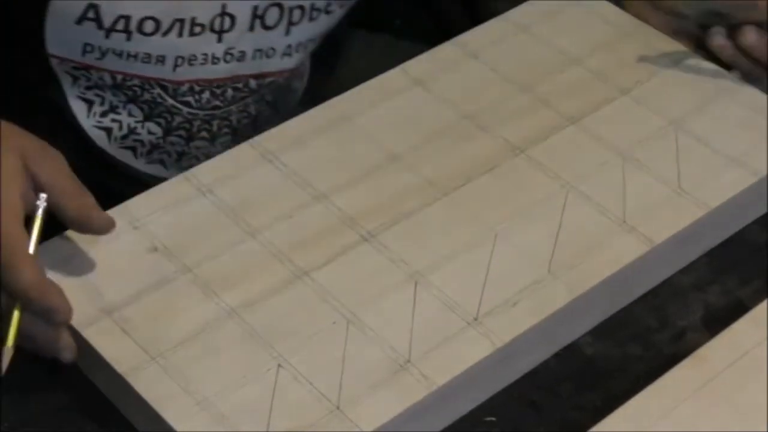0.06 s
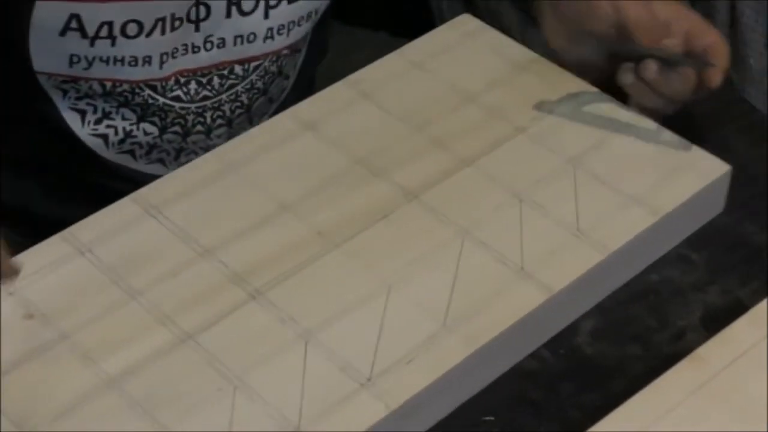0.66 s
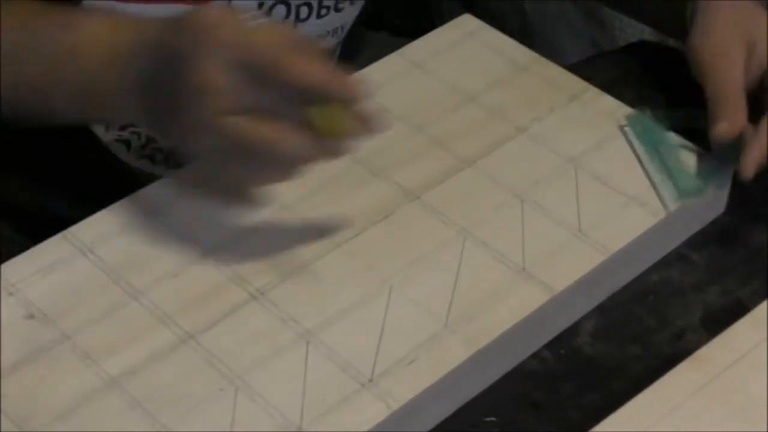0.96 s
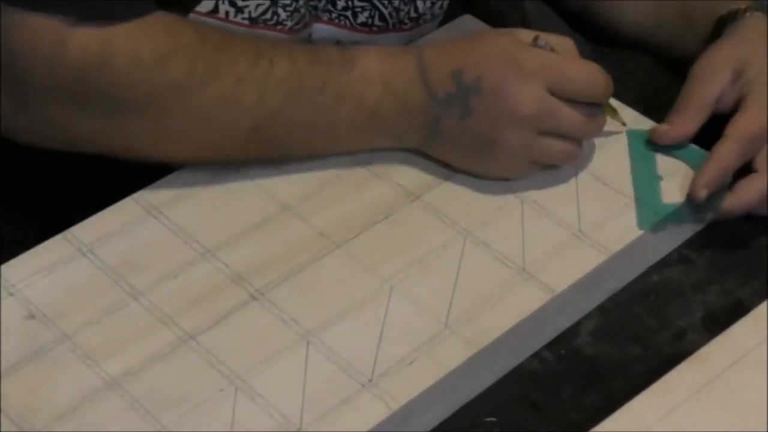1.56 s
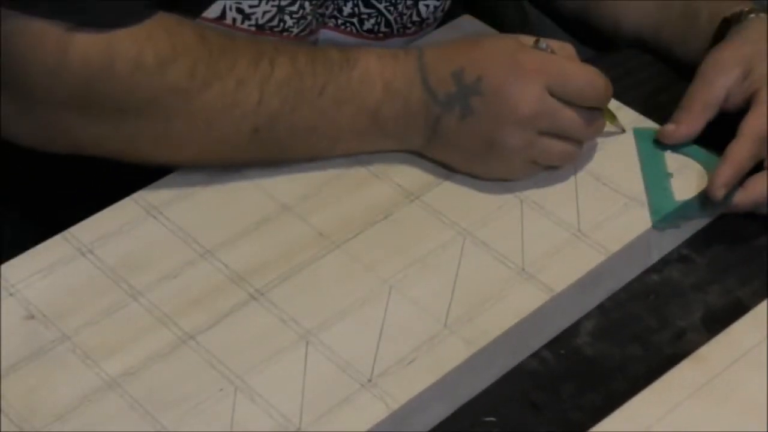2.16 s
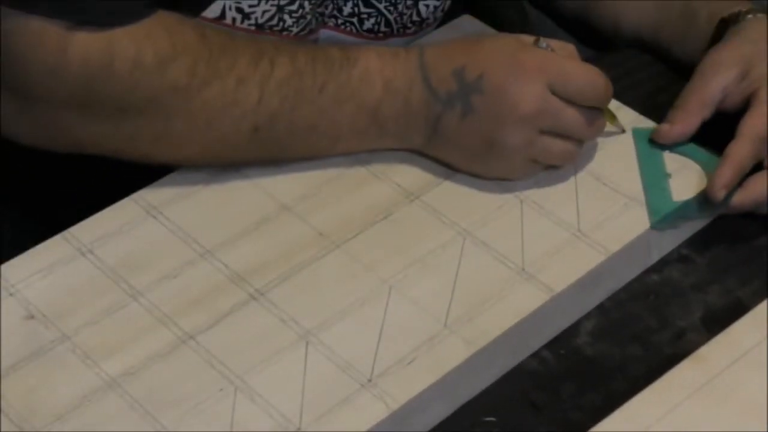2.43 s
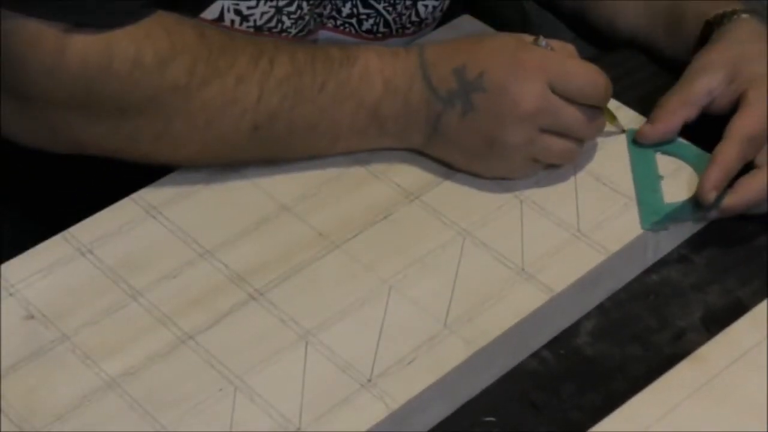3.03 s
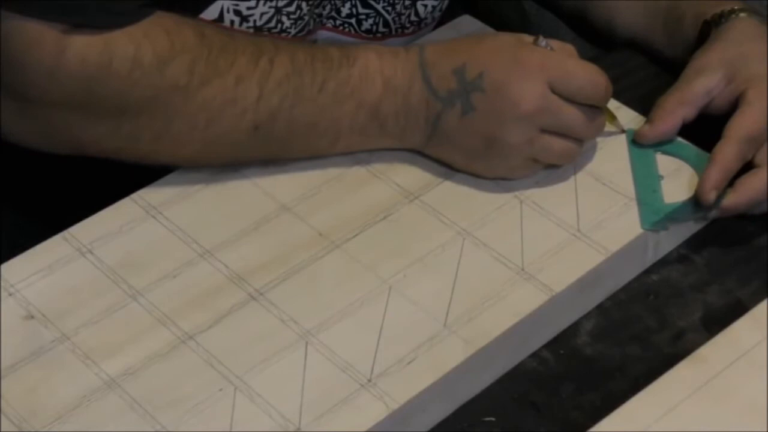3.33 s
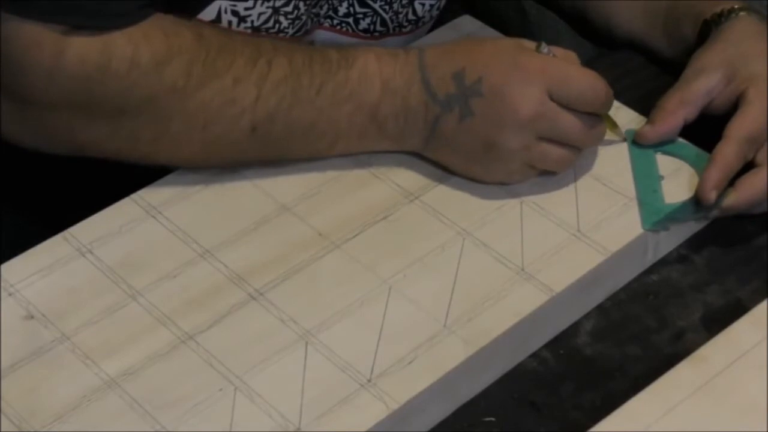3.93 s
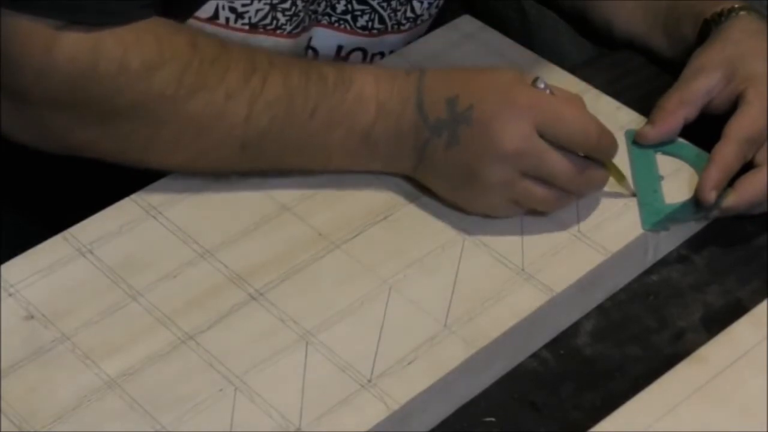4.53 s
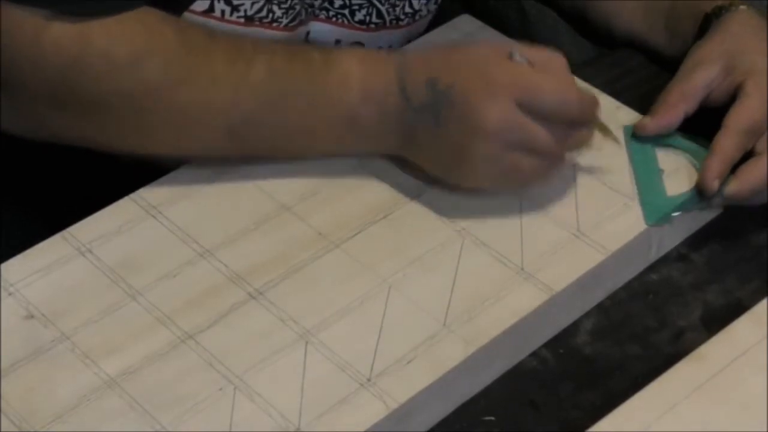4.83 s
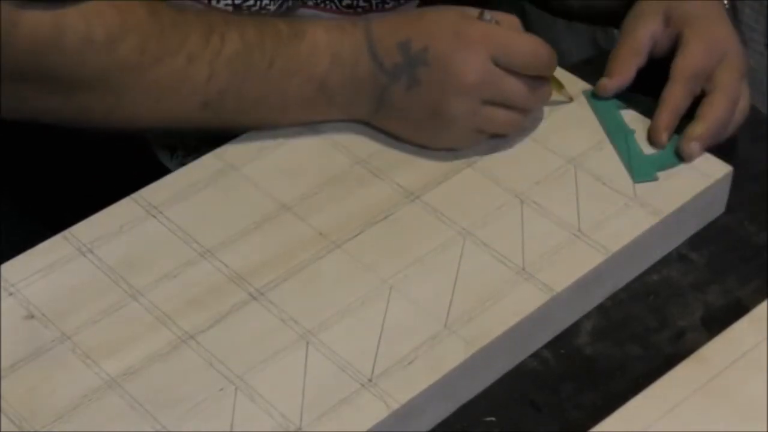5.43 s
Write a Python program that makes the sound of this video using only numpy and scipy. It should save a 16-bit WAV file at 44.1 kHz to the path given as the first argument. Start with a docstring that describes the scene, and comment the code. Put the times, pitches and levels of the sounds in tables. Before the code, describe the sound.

A plastic set square is put down on a wooden board with a light clack and a smaller rattling tap. Dull knocks follow as a hand settles, and a pencil makes a few faint, short scratches. After a pause come two sharp dry clicks, then the set square snaps down on the wood. It is all heard close up in a small, quiet workshop with a faint low hum.

```python
"""A plastic set square knocks on a wooden board, each hit a crack plus ringing modes.
It is put down; a hand with a pencil settles beside it with dull knocks and makes a short mark,
the lead catching on the grain. Sharp dry clicks sound close by, then the set square snaps down
on the wood. Two faint, breath-like swells of resonant hiss come at the start and before the clicks.
A faint low hum and hiss fill the small workshop."""
import sys
import numpy as np
from scipy import signal
from scipy.fft import rfft, irfft, next_fast_len
from scipy.io import wavfile
from scipy.ndimage import uniform_filter1d

SR = 44100
rng = np.random.default_rng(int(sys.argv[2]) if len(sys.argv) > 2 else 0)


def wrap_up_sound(samples):
    """Save the sound to the file named by the first command line argument, as 16-bit audio."""
    columns = np.atleast_2d(samples).T
    # keep every value between -1 and 1, then stretch to whole-number steps
    tamed = np.clip(columns, -1, 1)
    steps = np.round(tamed * 32767).astype(np.int16)
    wavfile.write(sys.argv[1], SR, steps)


N = 250929
TIME_S = np.arange(N) / SR
AGE_S = np.arange(SR // 2) / SR  # time since a blow
SIDE_SIGN = np.array([[1], [-1]])  # left, right


def amp(db):
    """Decibels to gain."""
    return 10 ** (np.asarray(db) / 20)


def unit_rms(x):
    """Scale to rms 1."""
    return x / np.sqrt(np.mean(x ** 2))


def unit_energy(x):
    """Scale to the energy of 10 ms at rms 1."""
    return x / np.sqrt(np.sum(np.atleast_2d(x) ** 2, axis=1).mean() / (SR // 100))


def decay(t60_s):
    """Exponential decay after a blow."""
    return np.exp(-np.log(1000) * AGE_S / t60_s)


def onset(rise_s):
    """Exponential rise to 1."""
    return 1 - np.exp(-AGE_S / rise_s)


def colour(x, points):
    """Minimum-phase filter through (frequency [Hz], gain [dB]) points."""
    size = next_fast_len(x.shape[-1] + 4096) * 2
    hz, db = np.transpose(points)
    gain = amp(np.interp(np.log(np.fft.rfftfreq(size, 1 / SR) + 1), np.log(hz), db))
    cepstrum = irfft(np.log(gain))
    cepstrum[1:size // 2] *= 2
    cepstrum[size // 2 + 1:] = 0
    return irfft(rfft(x, size) * np.exp(rfft(cepstrum)))[..., :x.shape[-1]]


def butter(x, hz, kind, order=2):
    """Low-pass or high-pass."""
    return signal.sosfilt(signal.butter(order, min(hz, .45 * SR), kind, fs=SR, output="sos"), x)


def stereo_noise(side_db):
    """Half a second of mid/side noise."""
    mid, side = rng.standard_normal((2, len(AGE_S)))
    return mid + amp(side_db) * side * SIDE_SIGN


def ring(modes, t60_scale, phase_rad=0):
    """Decaying modes; polarity and phase offset alternate between neighbours."""
    return unit_energy(sum((-1) ** k * amp(db) * np.sin(2 * np.pi * hz * AGE_S + (-1) ** k * phase_rad)
                           * decay(t60_s * t60_scale) for k, (hz, db, t60_s) in enumerate(modes)))


def stressed(modes, centre_hz, gain_db, log_width):
    """The struck spot favours or mutes the modes near one frequency."""
    return [(hz, db + gain_db * np.exp(-(np.log(hz / centre_hz) / log_width) ** 2), t60_s)
            for hz, db, t60_s in modes]


def add(out, time_s, x):
    """Mix x in at time_s."""
    start = int(time_s * SR)
    out[:, start:start + x.shape[-1]] += x[..., :N - start]


# hum envelope: (time [s], level [dB])
HUM_ENVELOPE = [(0, -63), (1.0, -63.5), (2.8, -65), (3.1, -69), (5.6, -65.5)]
# hiss spectrum: (frequency [Hz], gain [dB])
HISS_EQ = [(15, -50.5), (25, -23), (59, -10.5), (69, -14.5), (91, -3.5), (116, -7.5), (260, -12.5),
           (322, -16.5), (457, -14), (703, -17), (919, -17.5), (1270, -22.5), (1900, -21.5), (2360, -26),
           (15500, -32.5)]
# hiss width: (frequency [Hz], side minus mid [dB])
HISS_SIDE_EQ = [(25, 0), (60, -11), (120, -14.5), (300, -13.5), (600, -46), (1000, -33.5), (1600, -22),
                (3000, -23.5), (5000, -47), (16000, -20)]


def room_tone(hum_hz=89.3, hum_width_hz=9, hiss_db=-61):
    """A fluttering narrow-band hum that dips halfway, and steady hiss, widest in the bass."""
    hum_noise, mid, side = rng.standard_normal((3, N))
    detune = (np.fft.rfftfreq(N, 1 / SR) - hum_hz) / hum_width_hz
    hum = irfft(rfft(hum_noise) / (1 + (2 * detune) ** 2), N)
    hum /= np.sqrt(uniform_filter1d(hum ** 2, size=SR // 4))
    hum_db = np.interp(TIME_S, *np.transpose(HUM_ENVELOPE))
    hiss = colour(mid + colour(side, HISS_SIDE_EQ) * SIDE_SIGN, HISS_EQ)
    return amp(hum_db) * hum + amp(hiss_db) * unit_rms(hiss)


# set square on the board; also colours the swells: (frequency [Hz], level [dB], t60 [s])
SQUARE_MODES = [(200.6, -5, 0.19), (295, -2.5, 0.1), (361.7, 0, 0.28), (492, -9, 0.066), (717, -1.5, 0.13),
                (1103, 3, 0.14), (1234, 0.5, 0.2), (1496, 5.5, 0.09), (1618, -1, .15), (1664, 4, 0.082),
                (1895, -4, 0.079), (1965, 3, 0.04), (2190, 8, 0.04), (2400, 2, 0.083), (2545, 4, 0.1),
                (2690, 1.5, 0.07), (2900, 2, 0.056), (3030, 8.5, 0.039), (3400, -5, 0.065),
                (3580, 1.5, 0.074), (4450, -2.5, 0.086), (5190, 3, 0.06), (6300, 4, 0.099),
                (8050, 3, 0.076), (9600, 4, 0.073), (11130, 7, 0.083)]
# swell spectrum: (frequency [Hz], gain [dB])
SWELL_EQ = [(300, 3.5), (800, -3), (1300, -5), (1650, -0.5), (2020, -5), (2300, 5), (2550, -6), (2900, 0),
            (3400, -9.5), (3750, -0.5), (4050, -9), (4500, -6.5), (6000, -16), (10000, -7), (16000, -32)]
# swells of hiss: (start [s], attack [s], hold [s], release [s], level [dB], boosted band [Hz])
SOFT_SWELLS = [(0.02, 0.28, .3, 0.13, -61, 2520), (4.01, 0.11, 0.14, 0.12, -66.5, 1500)]


def soft_swells(ring_db=-10.5, boost_db=5.5, width_oct=0.81, spread_db=7.5):
    """Two faint, breath-like swells of resonant hiss."""
    out = np.zeros(N)
    for start_s, attack_s, hold_s, release_s, db, band_hz in SOFT_SWELLS:
        noise = rng.standard_normal(N) * amp(spread_db * rng.standard_normal(N))
        ringing = signal.fftconvolve(noise, ring(SQUARE_MODES, t60_scale=0.44))[:N]
        ringing = butter(ringing, 5500, "low", order=4)
        hiss = unit_rms(noise) + amp(ring_db) * unit_rms(ringing)
        eq = [(hz, gain_db + boost_db * np.exp(-(np.log2(hz / band_hz) / width_oct) ** 2))
              for hz, gain_db in SWELL_EQ]
        envelope = np.interp(TIME_S, start_s + np.cumsum([0, attack_s, hold_s, release_s]), [0, 1, 1, 0])
        out += amp(db) * envelope * unit_rms(colour(hiss, eq))
    return out


def plastic_wash(t60_scale, split_hz=9500, low_t60_s=0.15, high_t60_s=0.07, side_db=-11):
    """Dense short ringing of the plastic, central in the bass; the treble dies first."""
    mid, side = rng.standard_normal((2, len(AGE_S)))
    noise = mid + amp(side_db) * butter(side, 670, "high") * SIDE_SIGN
    low = butter(noise, split_hz, "low", order=1)
    high = noise - low
    return unit_energy(low * decay(low_t60_s * t60_scale) + high * decay(high_t60_s * t60_scale))


# plastic crack: (frequency [Hz], gain [dB])
CRACK_EQ = [(40, -2), (150, -8.5), (320, 0.5), (480, -5), (620, -9), (850, -8.5), (1350, -10), (1600, 0),
            (2000, -5), (2900, 1.5), (3300, -6), (4000, -8.5), (4500, -1), (6000, -4.5), (8000, 5),
            (10200, 5), (11500, 3.5), (13000, 1.5), (16000, -5)]
# stereo lean of a blow: (frequency [Hz], left minus right [dB])
LEFT_EQ = [(1100, 0), (2000, 1.7), (3000, 0.5), (5000, 0), (9000, 0)]


def square_blow(contact_hz, low_cut_hz, t60_scale, crack_db, snap_db, tick_db, node_hz, spot_hz):
    """One contact: a crack (tick, snap, wash) over the modes; softer contact removes treble."""
    modes = stressed(SQUARE_MODES, node_hz, gain_db=-11, log_width=0.13)
    modes = stressed(modes, spot_hz, gain_db=4, log_width=0.33)
    attack = onset(rise_s=0.00021)
    ringing = attack * np.array([ring(modes, t60_scale, phase_rad=ear * 0.15) for ear in (1, -1)])
    burst = unit_energy(attack * stereo_noise(side_db=-24) * decay(t60_s=0.028))
    tick = amp(tick_db) * unit_energy(signal.unit_impulse(len(AGE_S)))
    snap = amp(snap_db) * unit_energy(burst + tick)
    crack = amp(crack_db) * unit_energy(colour(snap + plastic_wash(t60_scale), CRACK_EQ))
    leak = amp(-37) * crack  # passes even a soft contact
    softened = butter(ringing + crack, contact_hz, "low", order=6) + leak
    left, right = butter(softened, low_cut_hz, "high")
    return unit_energy(np.array([colour(left, LEFT_EQ), right]))


# set square meets board or pencil: (time [s], level [dB], contact cut-off [Hz], low cut [Hz],
# crack [dB], snap [dB], tick [dB], t60 scale [ratio], muted modes [Hz], favoured modes [Hz],
# bounces [count], first gap [s], step per bounce [dB], last bounce cut-off [Hz])
SQUARE_HITS = [(0.4067, -29.5, 3970, 90, 5.5, -0.5, 8, 0.87, 880, 2220, 2, 0.0021, -6.5, 4200),
               (0.5764, -43.5, 4240, 1700, 2.5, -8, 2, 1.5, 980, 3200, 5, 0.0043, -2.12, 17000),
               (0.97, -60.5, 8900, 4380, 6, -3, -8, 0.73, 1050, 8300, 1, 0.0017, 4.5, 10004),
               (1.276, -50, 9600, 900, 8, -4, 2, 1.3, 2120, 3050, 1, .013, -7, 4000),
               (1.976, -58.5, 8800, 1200, 12, 13, -1, .5, 2150, 2700, 0, 0, 0, 0),
               (2.070, -59.5, 8100, 1500, 6, 11, -11, 0.69, 2130, 2680, 1, .004, -5, 3000),
               (2.5474, -52.5, 10800, 1800, 5, 5, -8, 0.42, 1500, 3600, 1, .0056, 1.5, 8700),
               (4.414, -56, 10000, 2000, -1, 12, -4, 0.88, 1500, 4200, 0, 0, 0, 0),
               (5.1, -26, 15700, 60, 12.5, 2.5, -10.5, 1.05, 1190, 2900, 1, 0.0158, -15.5, 10500)]


def square_hits(left_bias_db=0.3, gap_ratio=0.85, bounce_t60_ratio=0.6, bounce_low_cut_hz=670):
    """The set square lands; any bounces come ever sooner, catch only the edge and ring briefly."""
    out = np.zeros((2, N))
    for (time_s, db, contact_hz, low_cut_hz, crack_db, snap_db, tick_db, t60_scale,
         node_hz, spot_hz, bounces, gap_s, step_db, last_hz) in SQUARE_HITS:
        timbre = crack_db, snap_db, tick_db, node_hz, spot_hz
        landing = square_blow(contact_hz, low_cut_hz, t60_scale, *timbre)
        add(out, time_s, amp(db + SIDE_SIGN * left_bias_db / 2) * landing)
        for k in range(1, bounces + 1):
            time_s += gap_s * gap_ratio ** (k - 1)
            bounce_hz = contact_hz * (last_hz / contact_hz) ** np.sqrt(k / bounces)
            thin_hz = max(low_cut_hz, bounce_low_cut_hz)
            bounce = square_blow(bounce_hz, thin_hz, t60_scale * bounce_t60_ratio, *timbre)
            add(out, time_s, amp(db + k * step_db) * bounce)
    return out


# lead and hand sliding: (start [s], length [s], level [dB], time to peak [s])
SLIDE_STROKES = [(0.76, 0.33, -67, 0.21), (2.21, 0.22, -61, 0.094), (2.432, 0.17, -63, .09),
                 (2.777, 0.18, -68.5, .07)]


def stroke_pressure(attack_s=0.02, release_s=0.019, ease_db=-4):
    """Each stroke touches down, presses to a peak, eases and lifts."""
    pressure = np.zeros(N)
    for start_s, length_s, db, peak_s in SLIDE_STROKES:
        age_s = TIME_S - start_s
        gate = np.clip(np.minimum(age_s / attack_s, (length_s - age_s) / release_s), 0, 1)
        pressure += gate * amp(db + np.interp(age_s, [0, peak_s, length_s], [ease_db, 0, ease_db]))
    return pressure


# sliding on the grain: (frequency [Hz], gain [dB])
SLIDE_EQ = [(200, 1), (600, 9.5), (1100, 6.5), (2100, -6.5), (2550, 4.5), (3100, -4), (4000, -8),
            (5500, -6.5), (6700, -4.5), (7600, 3), (8800, 2.5), (10500, -10), (16000, -20)]


def pencil_slide(grain_step_s=0.008, grain_db=2.0, spread_db=8):
    """Dense tiny catches over harder and softer lines of grain, following the pressure."""
    lines_s = np.arange(0, N / SR, grain_step_s)
    hardness_db = grain_db * np.interp(TIME_S, lines_s, rng.standard_normal(len(lines_s)))
    catches = rng.standard_normal(N) * amp(spread_db * rng.standard_normal(N) + hardness_db)
    return unit_rms(colour(catches, SLIDE_EQ)) * stroke_pressure()


# snags of the lead: (frequency [Hz], gain [dB])
GRIT_EQ = [(300, -7), (950, 12), (1700, -2.5), (2600, 5), (3600, -3), (7000, -7), (12000, -18)]


def pencil_grit(snags_per_s=90, spread_db=2.6, relative_db=-5):
    """Coarser snags of the lead, each a tiny tick in the wood."""
    snags = (rng.random(N) < snags_per_s / SR) * amp(spread_db * rng.standard_normal(N))
    tick = rng.standard_normal(len(AGE_S)) * decay(t60_s=0.018)
    ticks = colour(signal.fftconvolve(snags, tick)[:N], GRIT_EQ)
    return amp(relative_db) * unit_rms(ticks) * stroke_pressure()


# hand-damped board: (frequency [Hz], level [dB], t60 [s])
WOOD_MODES = [(128, 7, 0.2), (166, -0.5, 0.3), (192.4, 2, 0.16), (250, -3.5, 0.13), (300, -7, 0.16),
              (470.5, 1, 0.17), (580, -12, 0.057), (697, -14, 0.092), (998, -3, 0.11), (1077, -2.5, 0.076),
              (1693, -8.5, 0.056), (1810, -3, 0.075)]
# board thud: (frequency [Hz], gain [dB])
THUD_EQ = [(80, -9), (250, -3), (550, 7.5), (1100, 1), (1900, 2.5), (2200, -8.5), (2700, 0.5), (4000, -2),
           (12000, 3)]
# hand, pencil and set square on the board:
# (time [s], level [dB], contact cut-off [Hz], low cut [Hz], t60 scale [ratio], favoured modes [Hz])
BOARD_KNOCKS = [(0.969, -52, 330, 221, 0.89, 270), (1.9778, -36.5, 1390, 398, 1.25, 770),
                (1.987, -43, 145, 125, 1.2, 146), (2.068, -54, 1900, 900, 0.66, 1050),
                (2.404, -50.5, 1390, 950, 0.24, 930), (2.476, -60, 2190, 1500, 0.58, 1890),
                (2.489, -51, 220, 190, 1.6, 189), (2.531, -56, 1500, 955, 0.52, 1070),
                (2.567, -44.5, 900, 430, 0.5, 626), (2.872, -56.5, 1000, 1100, .7, 1070),
                (5.102, -49, 400, 260, 1, 273), (5.456, -58.5, 1530, 202, 0.54, 500)]


def board_knocks(tail_db=2.5, ring_db=-9.0):
    """A soft push on the board excites its low modes and a diffuse tail."""
    out = np.zeros((2, N))
    push = unit_energy(signal.unit_impulse(len(AGE_S)))
    for time_s, db, contact_hz, low_cut_hz, t60_scale, spot_hz in BOARD_KNOCKS:
        tail = rng.standard_normal(len(AGE_S)) * decay(0.079 * t60_scale) * onset(rise_s=0.00095)
        thud = unit_energy(colour(push + amp(tail_db) * unit_energy(tail), THUD_EQ))
        modes = stressed(WOOD_MODES, spot_hz, gain_db=15, log_width=0.26)
        knock = butter(thud + amp(ring_db) * ring(modes, t60_scale), contact_hz, "low")
        add(out, time_s, amp(db) * unit_energy(butter(knock, low_cut_hz, "high")))
    return out


PING_HZ = 7990
# click body: (frequency [Hz], level [dB], t60 [s])
BODY_MODES = [(502, 2.5, 0.063), (933, -2, 0.024), (1047, 2, 0.019), (4060, 2, 0.019), (4450, 0, 0.0121),
              (5400, 10.5, 0.03), (7180, 8, 0.021), (7660, 10, 0.016), (8600, 3, 0.019), (9200, 13, 0.013),
              (11950, 13, 0.02), (14150, 10, 0.021)]
# click rattle: (frequency [Hz], gain [dB])
RATTLE_EQ = [(100, 6), (600, 5.5), (1050, 7.5), (1700, -2), (3200, -10.5), (4500, 4), (6300, -1), (7300, 5),
             (8700, 10), (10500, -10), (12000, 4), (16000, -6)]


def click_contact(rise_s, t60_s, body_db, body_hz, pitch_ratio, flutter_hz=260, flutter_db=-7.5):
    """A high resonance swells and dies unevenly, over a small body and a brief rattle."""
    swell = (AGE_S / rise_s) ** 2 * np.exp(2 - 2 * AGE_S / rise_s)
    tail = 0.7 * onset(rise_s) * decay(t60_s)
    phase_rad = 2 * np.pi * PING_HZ * pitch_ratio * AGE_S
    flutter = amp(flutter_db) * unit_rms(butter(rng.standard_normal(len(AGE_S)), flutter_hz, "low"))
    ping = unit_energy((swell + tail) * np.sin(phase_rad) + tail * flutter * np.cos(phase_rad))
    rattle = unit_energy(colour(rng.standard_normal(len(AGE_S)) * decay(t60_s=0.027), RATTLE_EQ))
    modes = stressed(BODY_MODES, body_hz, gain_db=14.5, log_width=0.07)
    modes = [(hz * pitch_ratio, db, mode_t60_s) for hz, db, mode_t60_s in modes]
    body = unit_energy(rattle + amp(-3.0) * ring(modes, t60_scale=0.98))
    return unit_energy(ping + amp(body_db) * body)


# double clicks: (time [s], level [dB], rise [s], ping t60 [s], body [dB], favoured modes [Hz],
# gap to second contact [s], its relative level [dB], its pitch [ratio])
DRY_CLICKS = [(4.415, -57, 0.00059, 0.11, -6, 4050, .003, -2, 1.1),
              (4.43, -62, 0.00054, .01, -9, 4050, 0.0036, -8, 1.04),
              (4.7937, -24, 0.0011, 0.022, -14, 903, 0.0034, -9, 0.99),
              (4.9518, -28, 0.00053, 0.002, -9.5, 1054, 0.0026, -7, 0.99)]


def dry_clicks():
    """A firm contact, then a softer one with more body and slightly shifted pitch."""
    out = np.zeros((2, N))
    for time_s, db, rise_s, t60_s, body_db, body_hz, gap_s, second_db, pitch_ratio in DRY_CLICKS:
        first = click_contact(rise_s, t60_s, body_db, body_hz, pitch_ratio=1)
        second = click_contact(rise_s * 1.54, t60_s, body_db + 5, body_hz, pitch_ratio)
        delay_s = round(gap_s * PING_HZ) / PING_HZ  # in step with the ringing
        add(out, time_s, amp(db) * first)
        add(out, time_s + delay_s, amp(db + second_db) * second)
    return out


def walls(x, wet_db, t60_s, side_db, damping_hz=9500):
    """Add faint workshop reverberation; the walls absorb the treble."""
    response = stereo_noise(side_db) * decay(t60_s) * onset(rise_s=0.019)
    response = butter(response, damping_hz, "low")
    response /= np.sqrt(np.sum(response[0] ** 2))
    return x + amp(wet_db) * signal.fftconvolve(x, response, axes=1)[:, :N]


def scene():
    """Hits and swells carry into the room; knocks, clicks and pencil are close and central."""
    close = board_knocks() + dry_clicks() + pencil_slide() + pencil_grit()
    roomy = square_hits() + soft_swells()
    return (walls(roomy, wet_db=-18.0, t60_s=0.17, side_db=-2.0)
            + walls(close, wet_db=-30, t60_s=0.15, side_db=-40)
            + room_tone())


def record(dry, top_hz=15900):
    """Steep elliptic low-pass."""
    return signal.sosfilt(signal.ellip(10, .2, 75, top_hz, fs=SR, output="sos"), dry)


dry = scene()
out = record(dry)
wrap_up_sound(out)
```